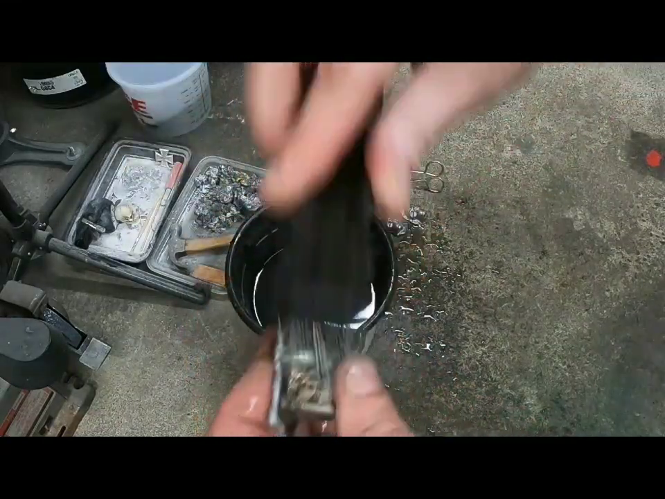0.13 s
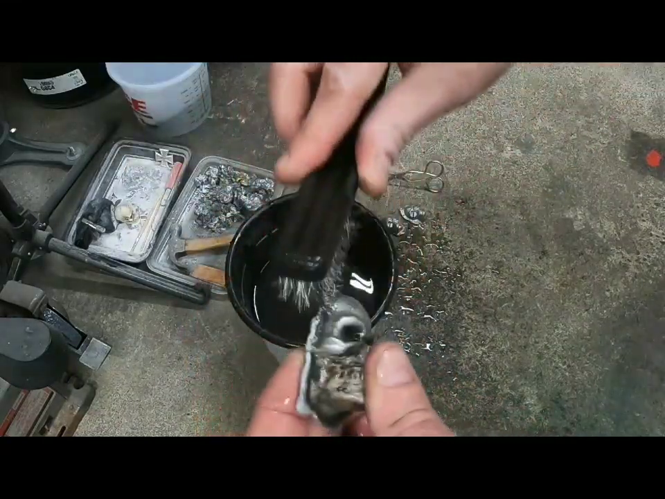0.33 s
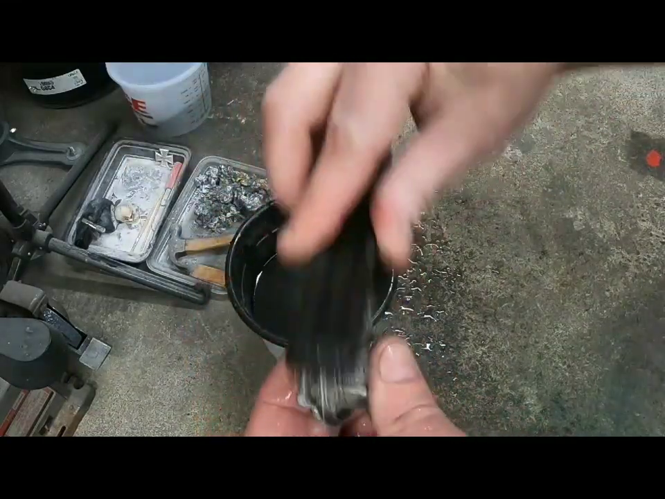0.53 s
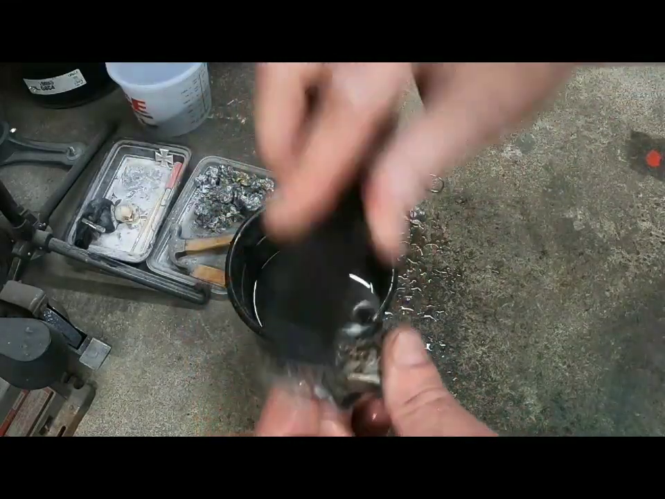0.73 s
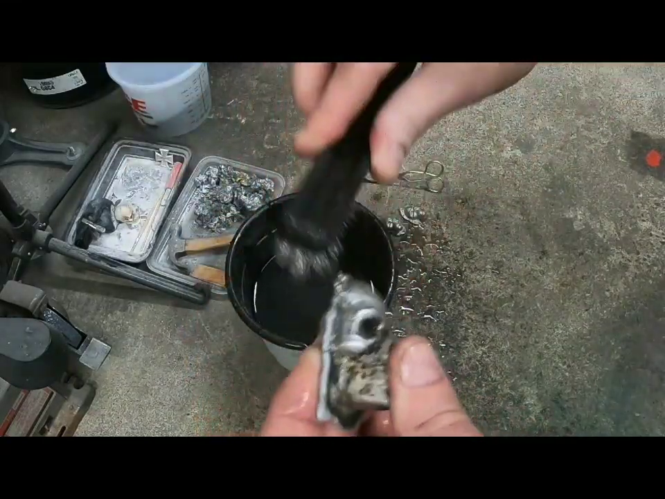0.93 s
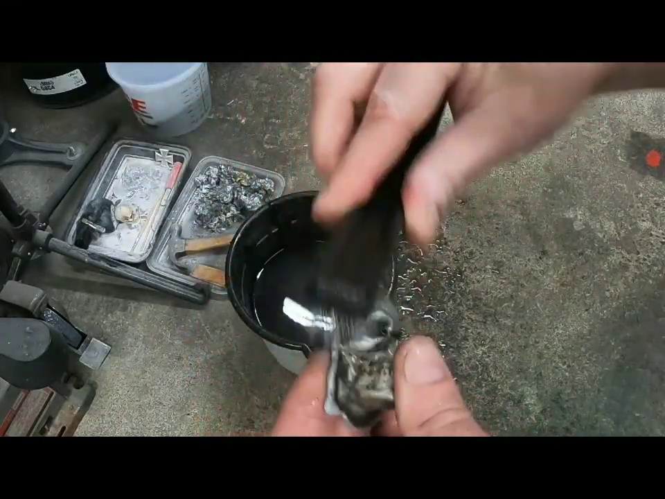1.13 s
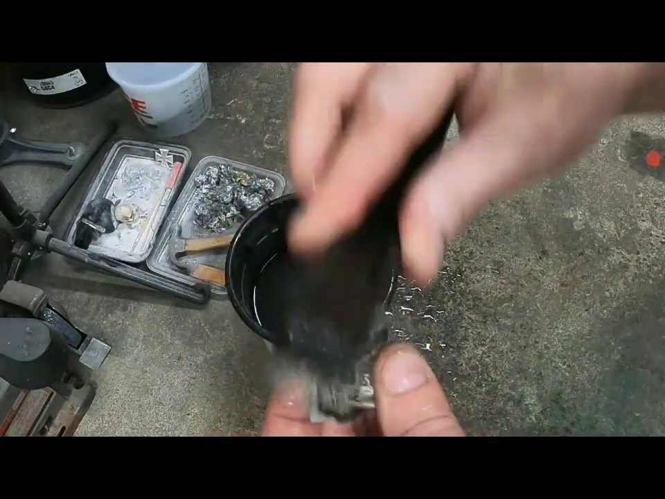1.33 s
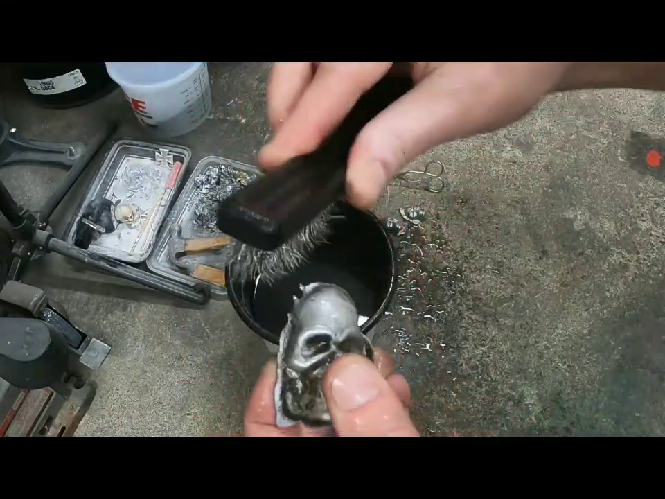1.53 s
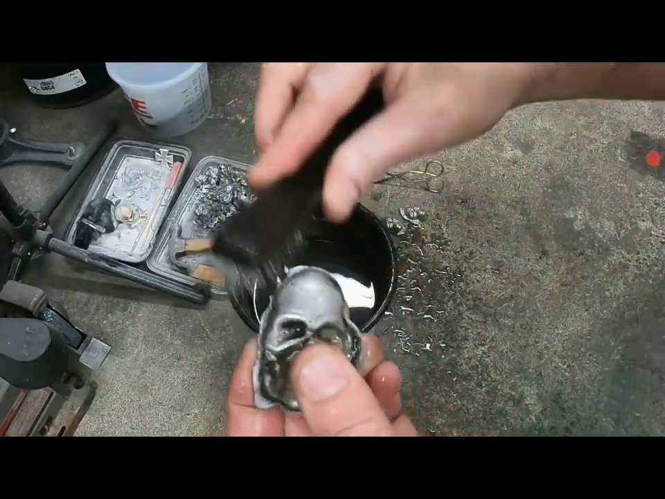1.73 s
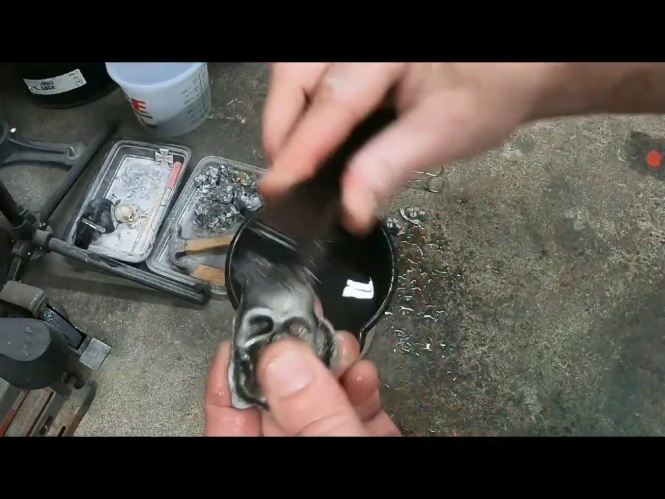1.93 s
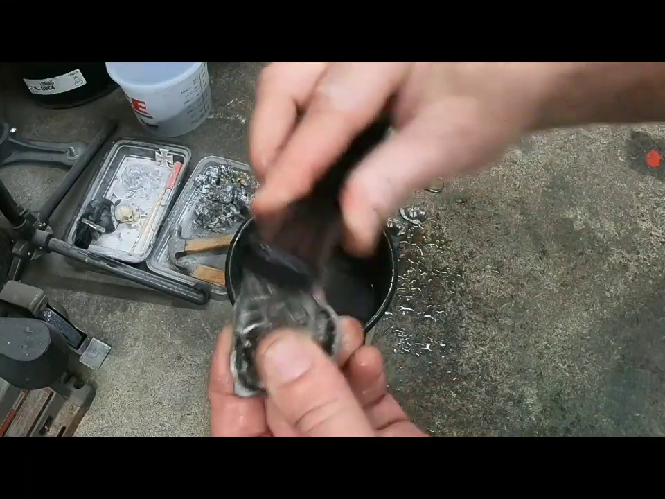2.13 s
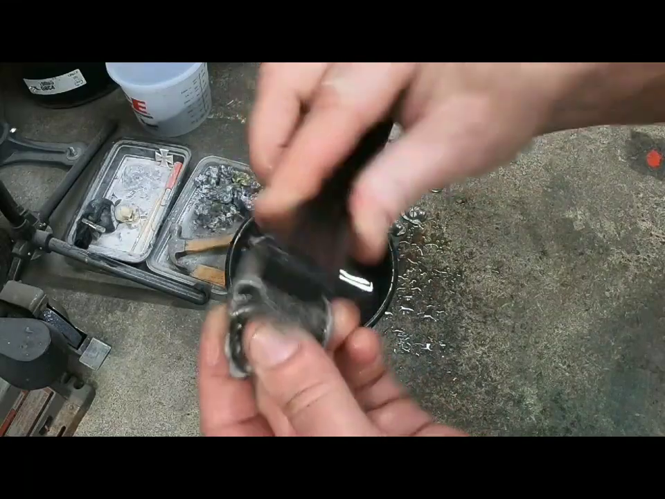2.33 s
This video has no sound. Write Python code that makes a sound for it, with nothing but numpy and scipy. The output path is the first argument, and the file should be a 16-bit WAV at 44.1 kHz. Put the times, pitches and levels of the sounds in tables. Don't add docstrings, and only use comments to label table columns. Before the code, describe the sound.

A wire brush scrubs a small metal casting, heard very close. A louder stroke ends at 0 s with a sharp double clack. Short hissy, gritty rasps begin near 0.23, 0.52, 0.81, 1.1, 1.4, 1.65, 1.9, 2.14 and 2.37 s, each about 0.1 s, with tiny metallic pings. Low thuds and rumble run beneath; a wavering hum rises around 2 s. Short garage echo, treble left, bass right.

```python
import sys
import numpy as np
from scipy import signal
from scipy.fft import rfft, irfft, next_fast_len
from scipy.io import wavfile
from scipy.ndimage import uniform_filter1d

SR = 44100
rng = np.random.default_rng(int(sys.argv[2]) if len(sys.argv) > 2 else 0)


def bounce(signal):
    frames = np.transpose(np.atleast_2d(signal))
    limited = np.clip(frames, -1, 1)
    pcm = np.round(limited * 32767).astype(np.int16)
    wavfile.write(sys.argv[1], SR, pcm)


def linear_from_db(decibels):
    return 10 ** (np.asarray(decibels, float) / 20)


N = 104825

# (touch/s, lift/s, pressure/dB, landing/dB, brightness/dB)
STROKES = [(-.1, 0.014, -30.5, -19, -1.5), (0.233, 0.368, -38, -12.5, 0), (0.517, 0.664, -36, -17, 0.5),
           (0.808, 0.916, -35.5, -12.5, 1), (1.106, 1.225, -38, -13.5, 0.5), (1.392, 1.493, -37, -13, -1),
           (1.659, 1.748, -37, -14.5, -1), (1.9, 2.012, -36.5, -11, -2), (2.137, 2.241, -37, -13.5, -1.5),
           (2.368, 2.452, -35, -12, -3)]
# (f/Hz, width/Hz, level/dB)
TIPS = [(4244, 1580, -5.5), (5735, 2360, -1.5), (6942, 1550, -2), (7825, 1420, -4.5)]


def evened(x):
    return x / np.sqrt(np.mean(x ** 2) + 1e-20)


def read(points, hz):
    f, value = np.transpose(points)
    return np.interp(np.log(hz + 1), np.log(f + 1), value)


def ring(x, peaks):
    hz = abs(np.fft.fftfreq(8192, 1 / SR))
    gain = sum(linear_from_db(db) / (1 + (2 * (hz - f) / width_hz) ** 2) for f, width_hz, db in peaks)
    log_gain = np.log(gain + 1e-5)
    taps = np.fft.ifft(np.exp(np.conj(signal.hilbert(log_gain)))).real[:4096]
    return signal.oaconvolve(x, taps[None] / np.linalg.norm(taps), axes=1)[:, :N]


def wander(size):
    return evened(uniform_filter1d(uniform_filter1d(rng.standard_normal(N), size), size))


def bursts(events, peaks, fade_s):
    u = np.arange(400) / SR / fade_s
    clicks = rng.standard_normal((len(events), 2, 400)) * u * np.exp(1 - u)
    x = np.zeros((2, N))
    for (s, db), click in zip(events, clicks):
        start = round(s * SR)
        x[:, start:start + 400] += linear_from_db(db) * click
    return ring(x, peaks)


def contact():
    # (first bite after touch/s, full depth after touch/s, sag to the lift/dB)
    digs = [(.013, 0.044, -6.5), (0.009, 0.055, -3), (0.011, 0.064, -7.5), (0.02, 0.052, -2),
            (0.0081, 0.051, -4.5), (0.011, 0.052, -3.5), (0.016, 0.043, -1.5), (0.011, 0.049, -8.5),
            (0.019, 0.042, -7), (.013, .048, -7.5)]
    land_s, lift_s = 0.0072, 0.0099
    dig_from_db, dig_bend = -23.5, 2.08
    t = np.arange(N) / SR
    dig, land, done, bright = np.zeros((4, N))
    for (touch, lift, db, land_db, bright_db), (bite, deep, sag_db) in zip(STROKES, digs):
        u = np.maximum(t - touch, 0)
        sag = sag_db * np.clip((t - touch - deep) / (lift - touch - deep), 0, 1)
        shallow = 1 - np.clip((u - bite) / (deep - bite), 0, 1)
        depth_db = dig_from_db * shallow ** dig_bend + sag
        dig += (t > touch) * linear_from_db(db + depth_db) * np.exp(-np.maximum(t - lift, 0) / lift_s)
        land += linear_from_db(db + land_db) * (u / land_s * np.exp(1 - u / land_s)) ** 2.1
        done = np.where(t > touch, np.clip(u / (lift - touch), 0, 1), done)
        bright = np.where(t > touch, bright_db, bright)
    return dig, land, done, bright


def slips():
    slips_per_s, spread_db, clump_db = 4000, 3.2, 2.6
    size = linear_from_db(spread_db * np.minimum(rng.exponential(1, (2, N)), 4))
    size = size * rng.choice([-1., 1.], (2, N))
    train = evened(size * (rng.random((2, N)) < slips_per_s / SR))
    return train * linear_from_db(clump_db * wander(size=64))


def brush():
    # (f/Hz, width/Hz, level/dB)
    drag_body = [(920, 1250, -11.5), (1800, 540, -6.5), (2530, 850, 2), (3210, 120, 6.5)]
    # (f/Hz, width/Hz, level/dB)
    fizz_body = [(8860, 2470, 11), (12900, 5400, -12.5), (13200, 2000, -22)]
    low_tip_db = [1, -2, 0, 0.5, 0, -1, 0.5, 0, 1, 0]
    low_tip_fade_db, drag_grow_db, fizz_law = -7, 7, 0.9
    dig, land, done, bright = contact()
    press = np.hypot(dig, land)
    stroke = np.searchsorted(np.array(STROKES)[:, 0], np.arange(N) / SR) - 1
    low_db = np.take(low_tip_db, stroke) + low_tip_fade_db * (done - .5)

    tips = np.zeros((2, N))
    for tip, colour_db in zip(TIPS, (low_db, -bright, bright, bright)):
        once = ring(slips() * press * linear_from_db(colour_db), [tip])
        tips += linear_from_db(tip[2]) * ring(once, [tip]) / np.sqrt(SR / tip[1] / 4)

    full = dig.max()
    fizz_press = full * (np.hypot(dig, 0.08 * land) / full) ** fizz_law
    fizz = ring(rng.standard_normal((2, N)) * fizz_press, fizz_body)
    drag = ring(slips() * dig * linear_from_db(drag_grow_db * (done - 1)), drag_body)
    return linear_from_db(-6) * tips + linear_from_db(-9) * fizz + linear_from_db(-10) * drag


def pings():
    # (t/s, level/dB, f/Hz)
    catches = [(0.2723, -25.5, 7500), (0.5465, -37, 5590), (0.5627, -26.5, 6920), (0.854, -24, 4240),
               (0.8654, -43, 6540), (0.903, -31, 7230), (1.1366, -32, 4260), (1.423, -28, 5500),
               (1.4318, -24, 6400), (1.6899, -27, 5640), (1.693, -31, 4040), (1.702, -20.5, 5650),
               (1.7114, -33, 5560), (1.73, -41, 5540), (1.931, -36, 3900), (2.1423, -31.5, 6910),
               (2.1614, -39, 3870), (2.175, -32, 6700), (2.182, -33, 5650)]
    level_db, fade_s = -6.5, .0011
    u = np.arange(800) / SR / fade_s
    out = np.zeros((2, N))
    for (s, db, hz), turn in zip(catches, rng.random((len(catches), 2, 1))):
        start = round(s * SR)
        swing = np.sin(2 * np.pi * (hz * u * fade_s + turn))
        out[:, start:start + 800] += linear_from_db(db + level_db) * u * np.exp(1 - u) * swing
    return out


def snaps():
    # (t/s, level/dB)
    short_snaps = [(.2345, -48), (.2495, -48), (.313, -48), (.4195, -53), (.518, -47), (.5465, -44), (.81, -49),
                   (1.109, -48), (1.394, -50), (1.66, -50), (2.169, -43), (1.119, -48), (1.41, -49), (1.905, -49),
                   (1.912, -40), (2.007, -44), (2.363, -51)]
    return bursts(short_snaps, TIPS, fade_s=0.0012)


def casting_knocks():
    # (t/s, level/dB)
    blows = [
        (.001, -17),
        (.0103, -12),
        (.0143, -16),
    ]
    # (f/Hz, width/Hz, level/dB)
    struck_body = [(846, 260, -3), (1730, 350, -8), (2360, 660, -1.5), (3660, 850, -7), (5020, 310, -3),
                   (5930, 420, -1), (7420, 480, -2)]
    return bursts(blows, struck_body, fade_s=0.00013)


def handle_knocks():
    # (t/s, level/dB)
    blows = [
        (.002, -40),
        (.009, -43),
    ]
    # (f/Hz, width/Hz, level/dB)
    hollow = [(827, 200, -4), (1180, 300, 1)]
    return bursts(blows, hollow, fade_s=.001)


def returns():
    # (t/s, length/s, tips level/dB, drag level/dB)
    passes = [(0.37, 0.063, -56.5, -68), (0.69, 0.32, -64.5, -64.5), (1.35, .06, -93, -85),
              (1.457, 0.37, -73, -58.5), (1.724, 0.23, -73, -63)]
    # (f/Hz, width/Hz, level/dB)
    rustle = [(795, 123, 10), (1310, 510, 4), (2220, 2100, -1)]
    t = np.arange(N) / SR
    arch = np.array([np.sin(np.pi * np.clip((t - s) / length, 0, 1)) ** 0.33
                     for s, length, _, _ in passes])
    tips, drag = linear_from_db(np.array(passes)[:, 2:]).T @ arch
    return ring(slips() * tips, TIPS) + ring(slips() * drag, rustle)


def thrum():
    # (t/s, level/dB)
    grip = [(0.0, -54.5), (0.07, -71), (0.47, -70.5), (0.58, -57.5), (0.67, -62), (0.87, -48.5),
            (1.0, -63.5), (1.2, -57.5), (1.33, -80.5), (1.458, -56.5), (1.63, -73.5), (1.709, -54),
            (1.9, -73), (1.93, -54), (2.13, -74.5), (2.208, -52), (2.3, -75), (2.38, -70)]
    # (f/Hz, width/Hz, level/dB)
    casting = [(275.4, 97, -1), (396.5, 190, -5.5), (487.4, 51, -2.5), (757, 300, -11)]
    grip_db = np.interp(np.arange(N) / SR, *np.transpose(grip))
    load = linear_from_db(2 + grip_db + 2.5 * wander(size=200))
    return ring(load * rng.standard_normal((2, N)), casting)


def mount():
    # (t/s, length/s, level/dB, f/Hz)
    jolts = [(0.205, 0.082, -45.5, 28.2), (0.35, 0.091, -34, 60.5), (0.602, 0.056, -40, 29.3),
             (0.785, 0.082, -39, 36.3), (0.877, 0.05, -37.5, 66.4), (1.119, 0.11, -34.5, 32.1),
             (1.29, 0.043, -40.5, 28), (1.474, 0.075, -37, 58.1), (1.685, 0.11, -37, 35.2),
             (1.888, 0.053, -36.5, 45.4), (1.972, 0.031, -32, 42.3), (2.006, 0.054, -31, 47.2),
             (2.221, 0.063, -39, 36.5), (2.308, 0.074, -42.5, 50.7)]
    # (t/s, level/dB)
    shaking = [(0.0, -46), (0.03, -45), (0.06, -54), (0.25, -48.5), (0.69, -52.5), (0.73, -44), (0.83, -43),
               (0.99, -43.5), (1.02, -51.5), (1.23, -46), (1.25, -55), (1.61, -45.5), (1.88, -50.5),
               (1.98, -49.5), (2.02, -40.5), (2.38, -52.5)]
    # (f/Hz, width/Hz, level/dB)
    mount_body = [(27.8, 29.5, 1.5), (58.7, 35, 4), (117.3, 57, -1), (164.8, 22, -1.5), (203.8, 37, -5),
                  (263.4, 36, -13.5)]
    t = np.arange(N) / SR
    shake = linear_from_db(-0.5 + np.interp(t, *np.transpose(shaking)) + 2.5 * wander(size=500))
    out = ring(shake * rng.standard_normal((2, N)), mount_body)
    for (s, length, db, hz), turn in zip(jolts, rng.random(len(jolts))):
        u = np.clip((t - s) / length, 0, 1)
        out[0] += linear_from_db(db) * np.sin(np.pi * u) ** 2 * np.sin(2 * np.pi * (hz * (t - s) + turn))
    return out


def shudders():
    # (t/s, length/s, level/dB, from f/Hz, to f/Hz)
    hums = [
        (1.99, 0.244, -43.5, 212, 188),
        (1.99, 0.097, -48.5, 150, 150),
        (.71, 0.11, -47.5, 165, 153),
        (2.6, 0.12, -52, 150, 55),
    ]
    t = np.arange(N) / SR
    out = np.zeros((2, N))
    for s, length, db, from_hz, to_hz in hums:
        u = np.clip((t - s) / length, 0, 1)
        hz = (from_hz + (to_hz - from_hz) * u ** 2) * (1 + 0.0274 * wander(size=400))
        swell = np.sin(np.pi * u ** 0.58) * linear_from_db(db + 1.2 * wander(size=400))
        hum = swell * np.sin(2 * np.pi * np.cumsum(hz) / SR)
        out += np.outer([.45, 1], hum)
    return out


def garage(x):
    # (f/Hz, t60/s)
    decay = [(500, 0.11), (1300, 0.35), (3500, 0.26), (9000, 0.26)]
    taps = np.zeros((2, SR // 2))
    at = np.arange(200, SR // 2 - 20, 20)
    at_jittered = at + rng.integers(0, 20, (2, len(at)))
    np.put_along_axis(taps, at_jittered, rng.choice([-1., 1.], (2, len(at))), 1)
    hz, t, z = signal.stft(taps, SR, nperseg=256)
    tail = signal.istft(z * linear_from_db(-60 * t / read(decay, hz)[:, None]), SR, nperseg=256)[1]
    return signal.fftconvolve(x, tail / np.linalg.norm(tail[0]), axes=1)[:, :N]


def air():
    # (f/Hz, level/dB)
    air_colour = [(100, -34), (500, -12.5), (800, -0.5), (1200, -16.5), (2500, -18.5), (4000, -24),
                  (6000, -18), (15000, -30)]
    z = rfft(rng.standard_normal((2, N))) * linear_from_db(read(air_colour, np.fft.rfftfreq(N, 1 / SR)))
    return linear_from_db(-64 + 1.5 * wander(size=4000)) * evened(irfft(z, N))


def scene():
    near = brush() + pings() + snaps() + casting_knocks() + handle_knocks() + returns()
    return near + linear_from_db(-9.5) * garage(near) + thrum() + mount() + shudders() + air()


def top_cut(x):
    return signal.sosfilt(signal.butter(12, 15450, fs=SR, output="sos"), x)


def record(dry):
    # (f/Hz, phase/rad)
    lead = [(180, 0), (500, 3), (700, 3.5), (1400, 4), (1900, 5), (3200, 5.5), (4600, 7), (10000, 8)]
    # (f/Hz, share/0..1)
    likeness = [(60, 0.99), (190, 0.55), (420, 0.91), (1400, 0.66), (3200, 0.86), (6500, 0.68),
                (9000, 0.18), (11000, 0.11)]
    # (f/Hz, level/dB)
    right_db = [(40, 4), (280, 9.5), (700, 1.5), (1300, -4.5), (2600, -5.5), (3400, -1), (7000, -7.5),
                (11500, -10)]
    # (f/Hz, width/Hz, depth/0..1)
    notches = [(3190, 200, .8), (4950, 450, .55), (8150, 450, .45)]
    size = next_fast_len(N + 4096)
    hz = np.fft.rfftfreq(size, 1 / SR)
    left, other = rfft(dry, size)
    same = np.clip(read(likeness, hz), 0, 1)
    shared = same * left * np.exp(-1j * read(lead, hz))
    right = linear_from_db(read(right_db, hz)) * (shared + np.sqrt(1 - same ** 2) * other)
    spectrum_gain = np.prod([1 - depth / (1 + (2 * (hz - f) / width_hz) ** 2)
                       for f, width_hz, depth in notches], axis=0)
    spectrum_gain = spectrum_gain * (hz > 12) * np.where(hz < 15050, 1, .18)
    pair = irfft(np.array([left, right]) * spectrum_gain, size)[:, :N]
    return top_cut(pair)


dry = scene()
out = record(dry)
bounce(out)
```